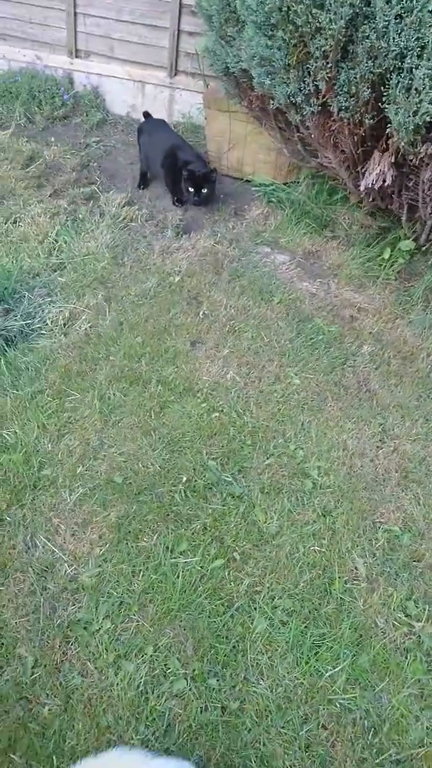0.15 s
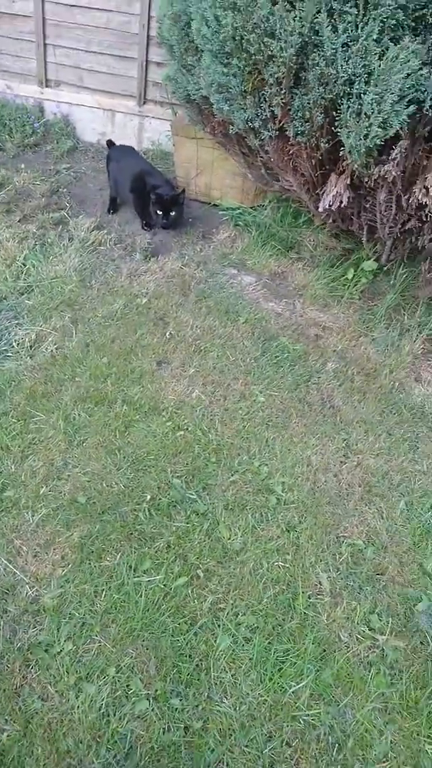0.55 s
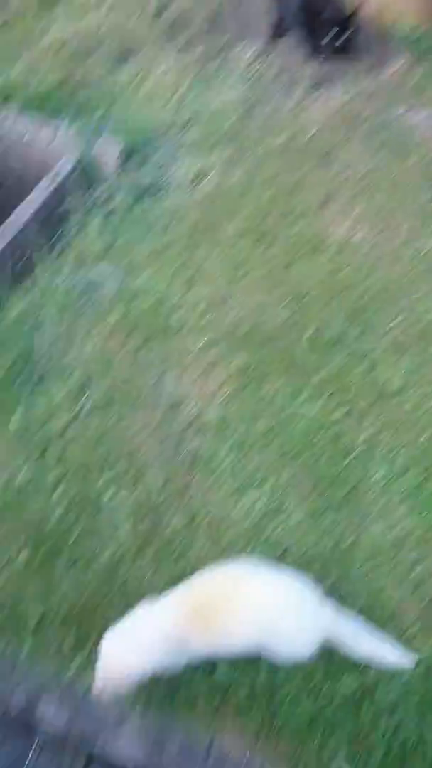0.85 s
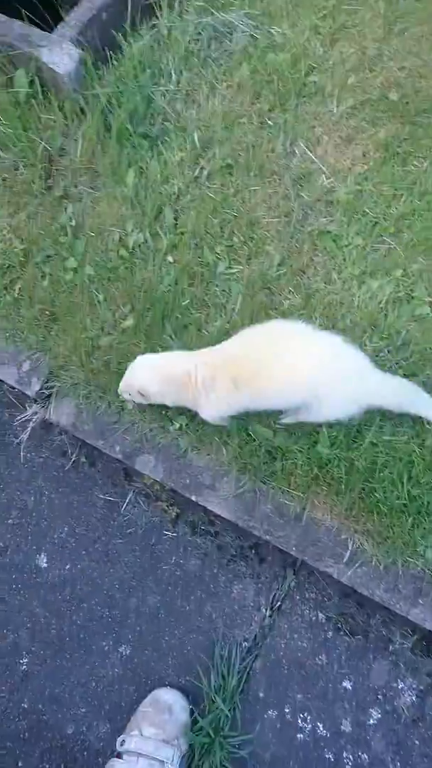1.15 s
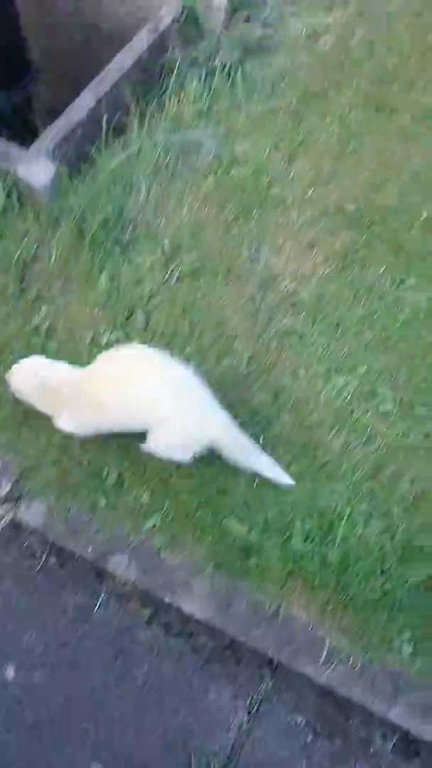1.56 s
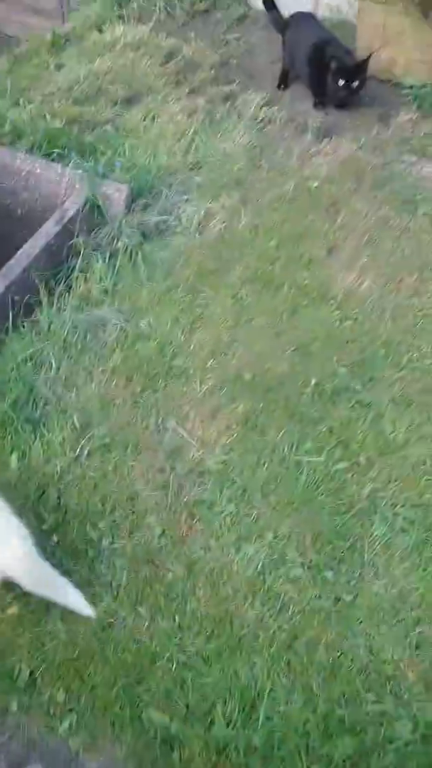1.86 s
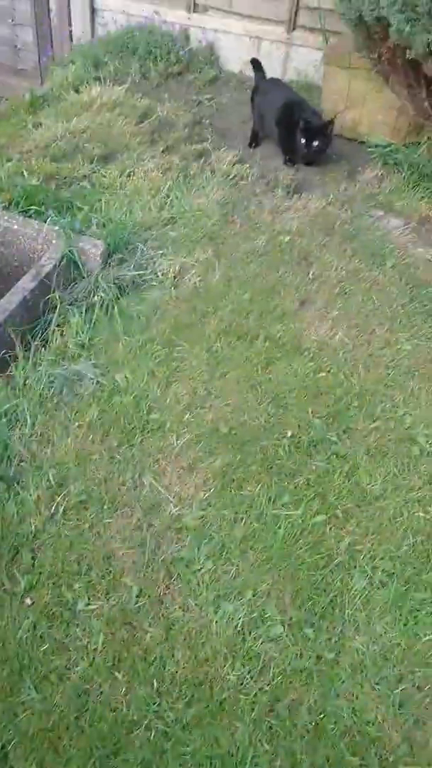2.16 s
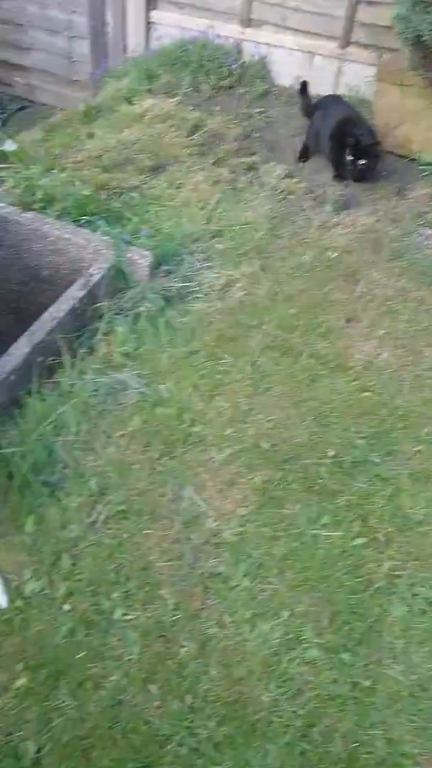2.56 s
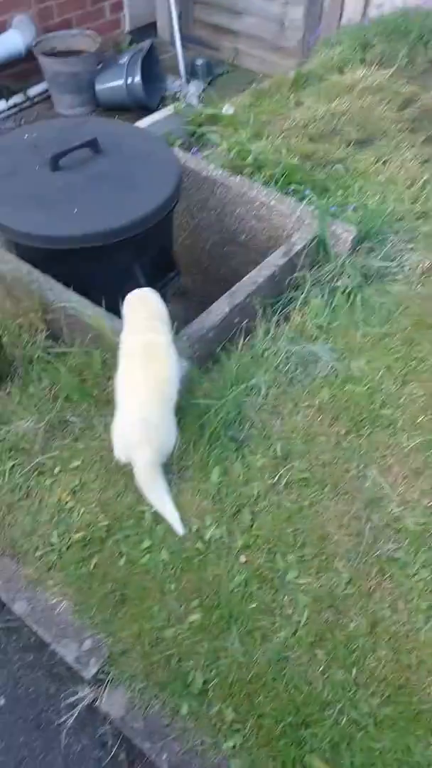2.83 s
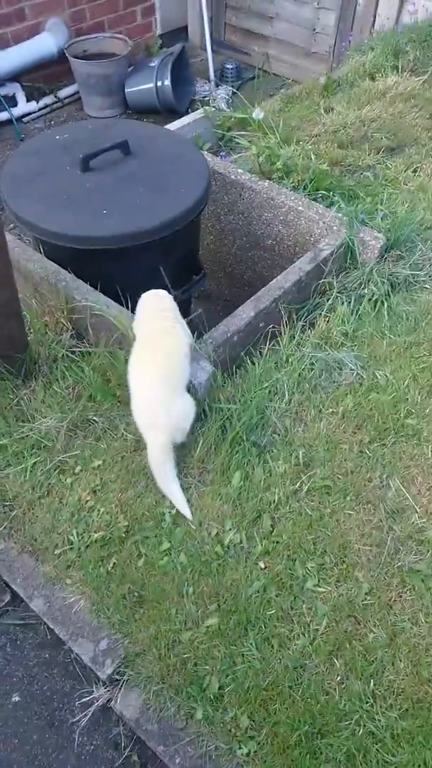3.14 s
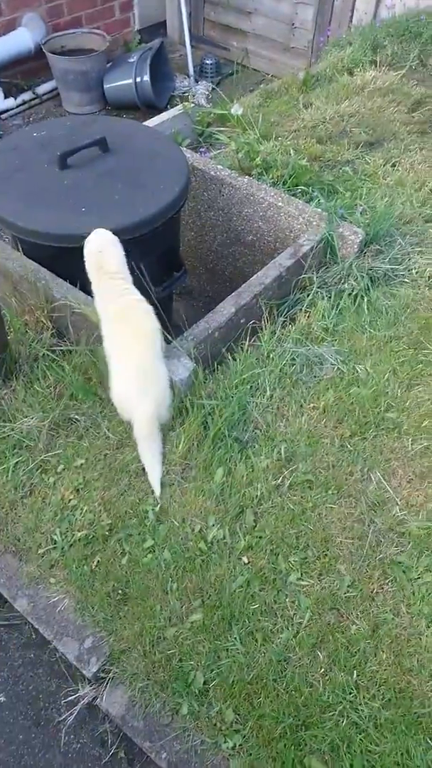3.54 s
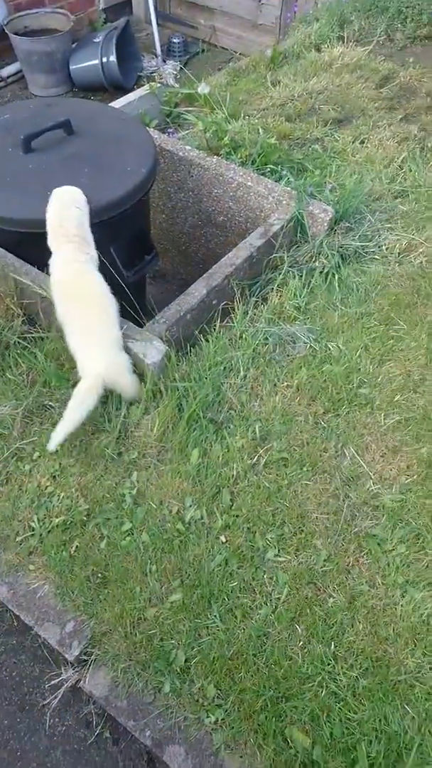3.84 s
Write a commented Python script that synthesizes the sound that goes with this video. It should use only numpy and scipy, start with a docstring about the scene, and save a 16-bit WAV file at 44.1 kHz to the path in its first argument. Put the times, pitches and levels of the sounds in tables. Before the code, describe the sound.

Short soft ferret clucks in a breezy garden, with faint grass rustle and small birds whistling

```python
"""Over a faint outdoor hum and hiss, wind turbulence buffets the left microphone port, then dies away in puffs.
Small birds pipe a few gliding whistles early on and sing more in the second half, echoed by garden fences.
From 1.2 s a ferret clucks close by as it trots over a lawn: short harmonic voices that sag and often crack.
Grass rustles under its steps as dense random grains; later, stems snap as decaying noise.
Near the end comes a soft hollow bump, a low tone that swells briefly."""
import sys
import numpy as np
from scipy import signal
from scipy.fft import rfft, irfft
from scipy.io import wavfile
from scipy.ndimage import uniform_filter1d

SR = 44100
rng = np.random.default_rng(int(sys.argv[2]) if len(sys.argv) > 2 else 0)


def persist_wave(psi):
    """Save psi, clipped to +-1, as 16-bit WAV."""
    counts = np.round(np.clip(psi, -1, 1) * 32767).astype(np.int16)
    wavfile.write(sys.argv[1], SR, np.atleast_2d(counts).T)


N = 176400
TIME = np.arange(N) / SR
FREQ = np.fft.rfftfreq(N, 1 / SR)


def amp(db):
    """The decibel law: amplitude ratio from level."""
    return 10 ** (np.asarray(db) / 20)


def evened(x):
    """Normalisation to unit root-mean-square."""
    return x / np.sqrt(np.mean(x ** 2) + 1e-20)


def read(points, hz):
    """Interpolation of a curve along logarithmic frequency."""
    f, value = np.transpose(points)
    return np.interp(np.log(hz + 1), np.log(f + 1), value)


def balance(pan_db):
    """Intensity stereo: left and right gains that differ by pan_db."""
    return amp([[pan_db / 2], [-pan_db / 2]])


def add(mix, s, sound, pan_db=0):
    """Superposition: adds a mono sound to the stereo mix from time s."""
    part = mix[:, max(round(s * SR), 0):][:, :len(sound)]
    part += balance(pan_db) * sound[:part.shape[1]]


def grid(size):
    """Short-time analysis grid: frame times as a column, and bin frequencies."""
    hop = size // 4
    return np.arange(N // hop + 5)[:, None] * hop / SR, np.fft.rfftfreq(size, 1 / SR)


def spectra(t, hz):
    """Gaussian noise as random short-time spectra for two channels."""
    shape = (2, len(t), len(hz))
    return rng.standard_normal(shape) + 1j * rng.standard_normal(shape)


def sound_of(z, size):
    """Overlap-add synthesis from short-time spectra."""
    return signal.istft(z.swapaxes(1, 2), nperseg=size, noverlap=size - size // 4)[1][:, :N]


def swell(t, middle, length):
    """Gaussian bell that falls to half power at the ends of its length."""
    return 2 ** (-2 * ((t - middle) / length) ** 2)


def filtered(noise, gain):
    """Linear filtering: weights the spectrum of a full-length noise, then evens its level."""
    return evened(irfft(rfft(noise) * gain, N))


def left_first(x, lead_s):
    """Interaural-style time difference: a linear phase delays the right port."""
    return np.array([x[0], irfft(rfft(x[1]) * np.exp(-2j * np.pi * FREQ * lead_s), N)])


def garden(x, t60, gap_s):
    """Sparse reflections from fences and walls: random taps decaying by 60 dB in t60, unlike in each ear."""
    t = np.arange(SR // 2) / SR
    taps = rng.standard_normal((2, len(t))) * (rng.random((2, len(t))) < .04) * (t > gap_s)
    taps = taps * np.exp(-np.log(1000) * t / t60)
    return signal.fftconvolve(x, taps / np.linalg.norm(taps, axis=1, keepdims=True), axes=1)[:, :N]


# Spectrum of distant hum and hiss. Each row: frequency in Hz, left and right relative density in dB per Hz.
AIR = [(19.8, -41, -26), (41.7, 8.5, 0), (67, -2, 0.5), (145, -8, -6), (244, -9, -4), (507, -11.5, -8),
       (1024, -11, -7), (1506, -16.5, -14), (2800, -23, -24), (4300, -24, -30.5), (8120, -29.5, -26.5),
       (10600, -35, -34), (15100, -37, -36.5)]
# Slow drift. Each row: time in seconds, relative level of the low hum in dB, of the treble in dB.
AIR_LEVEL = [(0, 6, 2.5), (.8, 3.5, 2), (1.15, 5, -3), (1.5, 4.5, -6.5), (2.1, 6, -2.5), (2.7, 3.5, 3),
             (3.3, 0.5, 3.5), (4, 2.5, 5)]
# Coherence of the ports. Each row: frequency in Hz, left-right correlation from -1 to 1.
SAME = [(60, 0.79), (250, 0.97), (640, 0.19), (1400, -0.12), (4000, 0.019)]
AIR_DB = -60.5  # overall level


def air(patchy_db=1.0, split_hz=3000):
    """Partly coherent diffuse noise: far-off hum under faint hiss, its spectrum drifting in patches."""
    t, hz = grid(size=1024)
    z = spectra(t, hz)
    same = np.clip(read(SAME, hz), -1, 1)
    z[1] = same * z[0] + np.sqrt(1 - same ** 2) * z[1]
    table = np.array(AIR)
    colour = np.array([read(table[:, [0, port]], hz) for port in (1, 2)])[:, None]
    s, low, high = np.transpose(AIR_LEVEL)
    treble = hz ** 2 / (hz ** 2 + split_hz ** 2)
    over_time = uniform_filter1d(rng.standard_normal(z.shape[1:]), size=12, axis=0)
    patches = evened(uniform_filter1d(over_time, size=10, axis=1))
    level = np.interp(t, s, low) * (1 - treble) + np.interp(t, s, high) * treble
    level = level + patchy_db * patches
    return amp(AIR_DB) * evened(sound_of(z * amp(colour + level), size=1024))


# Whistled notes. Each row: start in seconds, length in seconds, first, turning and last pitch in Hz,
# share of the note before the turn from 0 to 1, level in dB before flutter, left minus right in dB.
BIRD_NOTES = [(0, 0.083, 1780, 1775, 1780, .5, -74, 10), (0.052, 0.044, 2080, 2070, 2060, .5, -74.5, -6),
              (0.234, 0.069, 4450, 4300, 4400, .5, -83, 13), (0.377, 0.064, 4400, 4330, 4330, .5, -81, 9),
              (2.519, 0.08, 4410, 4310, 4280, 0.52, -75.5, 12.5),
              (2.7, 0.076, 4730, 4980, 3800, .68, -66, 14),
              (2.864, 0.061, 6030, 6040, 6480, 0.54, -70, -10),
              (2.919, 0.067, 6250, 6480, 5350, .33, -70.5, -3),
              (3.042, 0.048, 5050, 4780, 5010, 0.49, -65, 7.5),
              (3.132, 0.05, 4750, 4555, 4634, 0.3, -64.5, 10),
              (3.30, 0.047, 4460, 4410, 4500, 0.56, -71.5, 9),
              (3.331, 0.057, 4000, 4115, 3960, 0.41, -67.5, 9),
              (3.497, 0.047, 6400, 6460, 6700, 0.5, -78, -8),
              (3.517, 0.029, 5200, 4720, 3620, 0.62, -67, 7),
              (3.543, 0.029, 5600, 5780, 5600, 0.4, -72.5, 2), (3.583, .024, 5150, 5050, 4980, .5, -64, 11),
              (3.824, 0.053, 5400, 5290, 5220, 0.27, -63, 0.5),
              (3.882, .102, 5280, 4916, 4500, 0.54, -57.5, 9.5)]
# The song's buzz. Each row: time in seconds, depth of the sinusoidal pitch swing in Hz.
BUZZ = [(.05, 4), (.25, 60), (2.7, 48), (2.9, 35), (3.05, 106), (3.35, 120), (3.55, 100), (3.82, 12)]
BIRD_TRILL_HZ = 129.8  # rate of the buzz
BIRD_EDGE_S, BIRD_FLUTTER_DB = 0.011, 3
BIRD_LEAD_S = 0.000348  # arrival at the left port before the right
BIRD_ECHO_DB, BIRD_T60 = -2.5, 0.43  # echo level, decay in s


def birds():
    """Frequency modulation: thin whistles glide and turn, some with a fast buzz, and echo."""
    out = np.zeros((2, N))
    for start, length, first, turning, last, share, db, pan_db in BIRD_NOTES:
        t = np.arange(0, length, 1 / SR)
        u, share = t / length, np.clip(share, .1, .9)
        after_turn = np.maximum(u - share, 0) / (1 - share)
        hz = np.interp(u, [0, share], [first, turning]) + (last - turning) * after_turn ** 1.4
        smooth = uniform_filter1d(rng.standard_normal((2, 16384)), size=150)
        waver, flutter = evened(uniform_filter1d(smooth, size=100))[:, :len(t)]
        edges = np.minimum(np.minimum(t, length - t) / BIRD_EDGE_S, 1)
        trill = np.sin(2 * np.pi * BIRD_TRILL_HZ * t + flutter)
        buzz = np.interp(start, *np.transpose(BUZZ)) * (trill + .5 * waver)
        whistle = np.sin(2 * np.pi * np.cumsum(hz + buzz) / SR)
        add(out, start, amp(db) * edges * amp(BIRD_FLUTTER_DB * flutter) * whistle, pan_db)
    return left_first(out, BIRD_LEAD_S) + amp(BIRD_ECHO_DB) * garden(out, BIRD_T60, gap_s=0.0088)


# Gusts. Each row: middle in seconds, length in seconds, left and right level in dB before flicker.
GUSTS = [(-0.01, .2, -29, -40.5), (0.23, 0.075, -28.5, -43.5), (0.501, 0.33, -27.5, -52.5),
         (0.702, 0.036, -27.5, -48), (0.817, 0.041, -30.5, -39.5), (0.926, 0.076, -36.5, -33.5),
         (1.0, 0.026, -36, -33.5), (1.077, 0.052, -39.5, -55), (1.223, 0.029, -37.5, -67),
         (1.328, 0.26, -47, -59.5), (1.464, 0.049, -43.5, -56), (1.695, 0.095, -38, -54.5),
         (1.945, 0.11, -38.5, -57), (2.032, 0.043, -51, -42.5), (2.36, 0.031, -44.5, -69),
         (2.49, 0.11, -47.5, -53.5), (2.833, 0.05, -53, -78), (3.074, 0.052, -57.5, -61),
         (3.399, 0.038, -46.5, -65)]
WIND_LOW_HZ, WIND_CORNER_HZ = 56, 160.4  # lower edge; upper corner in the strongest wind
WIND_BRIGHTEN, WIND_SLOPE = 0.59, 3.1  # exponent of corner against force; steepness above the corner
WIND_FLICKER_DB = 2


def wind():
    """Turbulent pressure at each port: the harder the gust, the higher its rumble reaches."""
    t, hz = grid(size=2048)
    power = sum((amp([[left], [right]]) * swell(TIME, s, length)) ** 2 for s, length, left, right in GUSTS)
    force = np.sqrt(power + 1e-10)
    slow = np.array([np.interp(t, TIME, port) for port in force])
    corner = WIND_CORNER_HZ * (slow / slow.max()) ** WIND_BRIGHTEN
    above, below = (hz / corner) ** (2 * WIND_SLOPE), (WIND_LOW_HZ / (hz + 1)) ** 9
    colour = 1 / np.sqrt((1 + above) * (1 + below))
    colour /= np.linalg.norm(colour, axis=2, keepdims=True)
    rumble = sound_of(spectra(t, hz) * colour, size=2048)
    # Level the rumble over a running window, so that the gusts alone set its slow envelope
    window = signal.get_window("hann", 6000)[None] / 3000
    rumble /= np.sqrt(signal.oaconvolve(rumble ** 2, window, "same") + 1e-20)
    blur = signal.get_window("hann", Nx=1024)[None]
    flicker = evened(signal.oaconvolve(rng.standard_normal((2, N)), blur, "same"))
    return rumble * force * amp(WIND_FLICKER_DB * (flicker - 1.0))


# Eddies that hit the left port. Each row: time in seconds, peak of the push in dB, its pitch in Hz.
BUFFETS = [(0.034, -36.5, 341), (.064, -36, 300), (0.106, -28, 224), (0.3735, -26.5, 322),
           (0.438, -22, 190), (0.445, -20, 144), (.478, -21.5, 220), (0.4919, -17.5, 137),
           (0.572, -21, 171), (0.577, -29, 310), (0.5846, -25.5, 258), (.624, -30.5, 338),
           (0.645, -28, 244), (0.696, -30.5, 313), (0.722, -32.5, 270), (0.831, -20.5, 95)]


def buffets(puff_db=-15, puff_s=0.0058, puff_reach=1.57):
    """Eddy pressure pulses: a push or pull flanked by its opposite, inside a puff of finer turbulence."""
    out = np.zeros((2, N))
    for s, db, hz in BUFFETS:
        u = (np.pi * hz * (TIME - s)) ** 2
        push = rng.choice([-1, 1]) * (1 - 2 * u) * np.exp(-np.minimum(u, 50))
        puff = filtered(rng.standard_normal(N), FREQ / (1 + (FREQ / (puff_reach * hz)) ** 6))
        out[0] += amp(db) * (push + amp(puff_db) * swell(TIME, s, puff_s) * puff)
    return out


# Brushed grass. Each row: middle in seconds, length in seconds, level in dB,
# tilt above 1 kHz in dB per octave, left minus right in dB.
RUSTLES = [(1.17, 0.4, -72.5, -0.5, 2.5), (1.518, 0.11, -73.5, -0.5, 0), (1.7, 0.21, -73, -0.5, 1),
           (1.948, 0.21, -74.5, 2.5, 0.5), (2.14, 0.074, -71, -2, 3), (2.232, 0.049, -61.5, -3, 4),
           (2.43, .26, -69, -2, 0.5), (3.05, 0.15, -75, -2, 2), (3.338, 0.043, -71.5, -1, -2),
           (3.523, 0.066, -71.5, -2, 3), (3.595, 0.025, -62.5, 2, -5), (3.822, 0.052, -70.5, -4, 5)]
# Colour of the rustle. Each row: frequency in Hz, relative level in dB.
GRASS = [(200, 2), (900, -3), (2000, -4), (4500, 2), (7500, -1.5), (10500, -7), (15000, -6)]
GRASS_SNAPS_PER_S, GRASS_SPREAD_DB, GRASS_HISS = 4000, 5, 1  # grain rate, mean excess, share of hiss
# Dry stems that snap. Each row: start in seconds, peak in dB, upper edge of the ring's band in Hz,
# left minus right in dB.
SNAPS = [(3.029, -58, 3780, 11), (3.085, -58, 3800, 7), (3.6033, -57, 1700, 0), (3.786, -58, 3800, 8),
         (3.8251, -53, 3900, 8)]
SNAP_DECAY_S = 0.00067


def grass():
    """Granular friction: steps brush blades into dense random crackle; now and then a stem snaps."""
    out = np.zeros((2, N))
    for s, length, db, tilt_db, pan_db in RUSTLES:
        hits = rng.random((2, N)) < GRASS_SNAPS_PER_S / SR
        grains = hits * amp(GRASS_SPREAD_DB * np.minimum(rng.exponential(1, (2, N)), 4))
        drive = evened(grains) + GRASS_HISS * rng.standard_normal((2, N))
        tilt = tilt_db * np.log2(np.maximum(FREQ, 1000) / 1000)
        colour = amp(read(GRASS, FREQ) + tilt) * (FREQ > 100)
        out += amp(db) * balance(pan_db) * swell(TIME, s, length) * filtered(drive, colour)
    t = np.arange(512) / SR
    for s, db, ring_hz, pan_db in SNAPS:
        band = signal.butter(2, [ring_hz / 2, ring_hz], "band", fs=SR)
        snap = signal.lfilter(*band, rng.standard_normal(len(t)) * np.exp(-t / SNAP_DECAY_S))
        add(out, s, amp(db) * snap / abs(snap).max(), pan_db)
    return out


# Blades that slide over one another. Each row: middle in seconds, length in seconds, centre in Hz,
# level in dB, left minus right in dB.
SWISHES = [(2.219, 0.0072, 4400, -63, 15), (2.2405, .007, 6940, -63.5, -9), (2.241, 0.01, 13000, -73, -6),
           (3.591, .006, 6200, -63.5, -4), (3.61, 0.0034, 13300, -67, -8)]


def swishes(width=0.24):
    """Band-limited friction noise: blades slide past each other in brief narrow hisses."""
    out = np.zeros((2, N))
    for s, length, centre, db, pan_db in SWISHES:
        hiss = filtered(rng.standard_normal((2, N)), swell(FREQ, centre, width * centre))
        out += amp(db) * balance(pan_db) * swell(TIME, s, length) * hiss
    return out


# Soft hollow bumps. Each row: middle in seconds, length in seconds, pitch in Hz, level in dB.
BUMPS = [(3.868, .03, 245, -60)]


def bump():
    """Low resonance: a sine that swells briefly, perhaps the bin as the ferret climbs."""
    return sum(amp(db) * swell(TIME, s, length) * np.sin(2 * np.pi * hz * TIME)
               for s, length, hz, db in BUMPS)


# Clucks. Each row: start in seconds, length in seconds, mid pitch in Hz, share of pitch lost,
# level in dB, second harmonic gain in dB, higher harmonics gain in dB, crack from 0 to 1,
# squeak in dB against the body, left minus right in dB.
CLUCKS = [(1.172, 0.017, 562, 0.031, -49, 12.5, 2, .15, -35, -6),
          (1.284, 0.013, 550, .1, -55.5, 12, 4.5, 0, -38, -7),
          (1.465, 0.014, 544, .08, -57.5, 12, 11.5, 0.3, -31.5, -6),
          (1.546, 0.023, 604, 0.051, -53, -3, -0.5, 0.7, -22.5, -4.5),
          (1.661, 0.017, 576, 0.3, -51.5, -6.5, -5.5, 0.76, -29, -3),
          (1.814, 0.025, 556, 0.12, -52.5, 3, -5, 0.1, -32, 0),
          (1.952, 0.027, 591, 0.042, -49.5, 6, -1.5, 0.72, -33, -4),
          (2.197, .015, 576, 0.18, -53.5, 6, 11, 1, -23, -4.5),
          (2.809, .015, 515, 0.09, -61, 12.5, 0, .1, -28, 2),
          (3.728, .015, 589, 0.07, -50.5, 7, 5, 0.5, -31, -1),
          (3.8842, .015, 650.6, 0.18, -46, 3.5, 3, 0.98, -28, 0),
          (3.8967, 0.017, 577, 0.15, -49, 7.5, 4, 0.46, -29, -3.5)]
# Resonances of the throat. Each row: frequency in Hz, gain of a harmonic there in dB.
THROAT = [(280, 8.5), (400, -4), (550, 7.5), (850, 0.5), (1200, 0), (1420, -1.5), (1750, -8), (2350, -10.5),
          (2900, -26), (6500, -62)]
CLUCK_RISE_S, CLUCK_FALL_S = 0.0023, 0.002
CLUCK_ARCH, CLUCK_JITTER, CLUCK_RASP = 0.026, 0.014, 0.1  # shares of pitch; share of noise
CRACK_AT, CRACK_S = 0.59, 0.0031  # share of the cluck before the crack; its duration
SQUEAK_HZ, SQUEAK_WIDTH_HZ = 4370, 380  # a high throat resonance and its half-width
FERRET_LEAD_S = 0.00021  # arrival at the left port before the right
CLUCK_ECHO_DB, CLUCK_T60 = -7.5, 0.15  # echo level, decay in s


def ferret():
    """Source-filter voice with period doubling: pitch sags; in a crack the fundamental yields to half-pitch lines."""
    out = np.zeros((2, N))
    for start, length, pitch, sag, db, second_db, upper_db, crack, squeak_db, pan_db in CLUCKS:
        t = np.arange(0, length, 1 / SR)
        u, noise = t / length, rng.standard_normal((2, 4096))
        jitter = evened(uniform_filter1d(noise[0], size=60))[:len(t)]
        arch = CLUCK_ARCH * (np.sin(np.pi * u) - np.pi / 4)
        hz = pitch * (1 - sag * (u - .5) + arch + CLUCK_JITTER * jitter)
        turn = 2 * np.pi * np.cumsum(hz) / SR

        def partial(k):
            """Resonant filtering: one line at k times the pitch, weighted by the throat."""
            return amp(read(THROAT, k * hz)) * np.cos(k * turn)

        cracked = min(crack, 1) * np.clip((t - CRACK_AT * length) / CRACK_S, 0, 1)
        upper = sum(partial(k) for k in range(3, 11))
        # The fundamental lies 1 % flat of the harmonic series
        voice = (1 - cracked) * partial(0.99) + amp(second_db) * partial(2) + amp(upper_db) * upper
        halves = sum(partial(k + .5) for k in range(5))
        throat = amp(read(THROAT, np.fft.rfftfreq(noise.shape[1], 1 / SR)))
        rasp = evened(irfft(rfft(noise[1]) * throat))[:len(t)]
        body = evened(voice + 0.68 * cracked * halves) + CLUCK_RASP * rasp
        squeak = evened(sum(swell(k * hz, SQUEAK_HZ, 2 * SQUEAK_WIDTH_HZ) * np.cos(k * turn)
                            for k in range(6, 12)))
        edges = np.minimum(t / CLUCK_RISE_S, 1) * np.minimum((length - t) / CLUCK_FALL_S, 1)
        add(out, start, amp(db) * edges * (body + amp(squeak_db) * squeak), pan_db)
    return left_first(out, FERRET_LEAD_S) + amp(CLUCK_ECHO_DB) * garden(out, CLUCK_T60, gap_s=.004)


def scene():
    """Superposition of all the sources at the two ports."""
    return air() + birds() + wind() + buffets() + grass() + swishes() + bump() + ferret()


LOW_CUT_HZ, EDGE_HZ = 54.2, 15700


def record(dry):
    """Band limiting: a steep bass cut, then a linear-phase low-pass."""
    high_pass = signal.butter(6, LOW_CUT_HZ, "high", fs=SR, output="sos")
    low_pass = signal.firwin(1023, EDGE_HZ, window=("kaiser", 9), fs=SR)
    return signal.oaconvolve(signal.sosfilt(high_pass, dry), low_pass[None], "same")


dry = scene()
out = record(dry)
persist_wave(out)
```